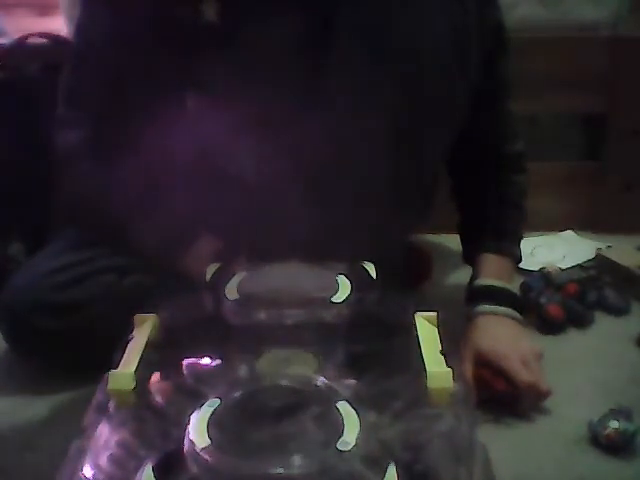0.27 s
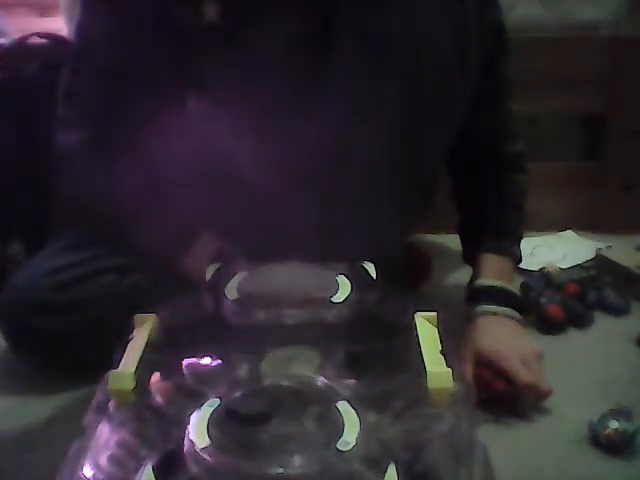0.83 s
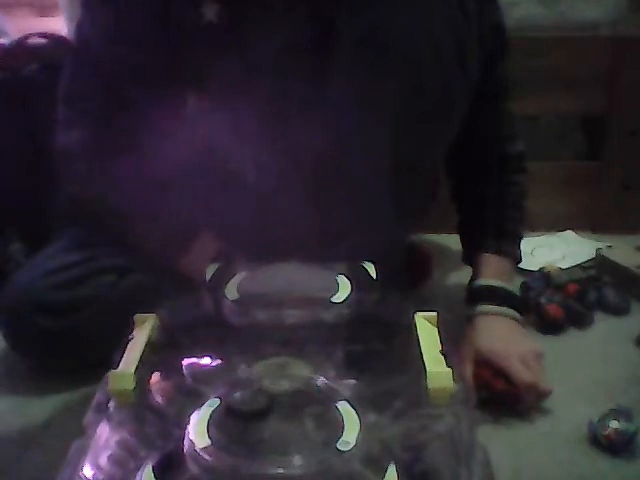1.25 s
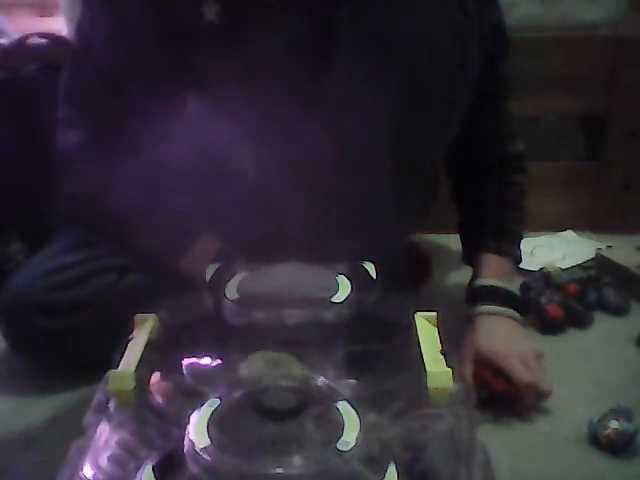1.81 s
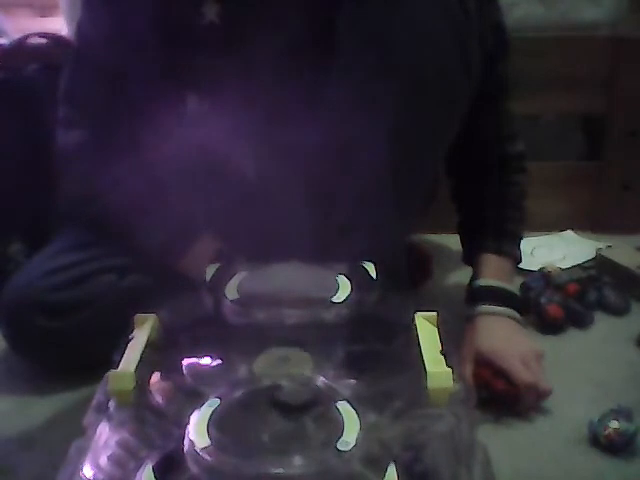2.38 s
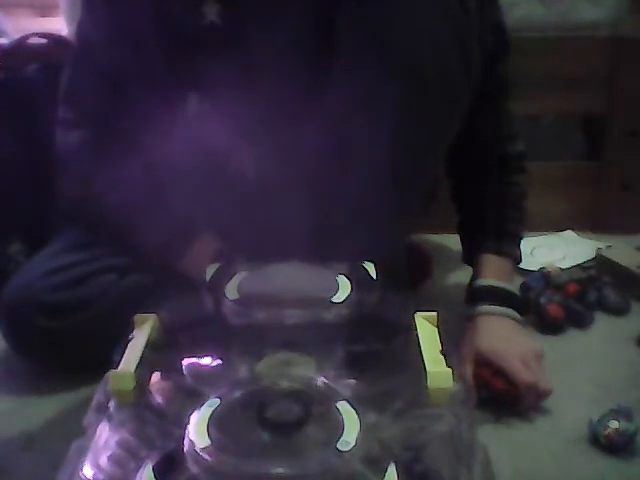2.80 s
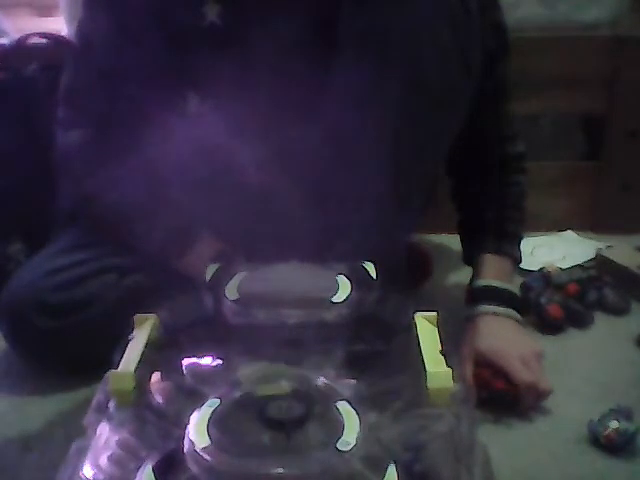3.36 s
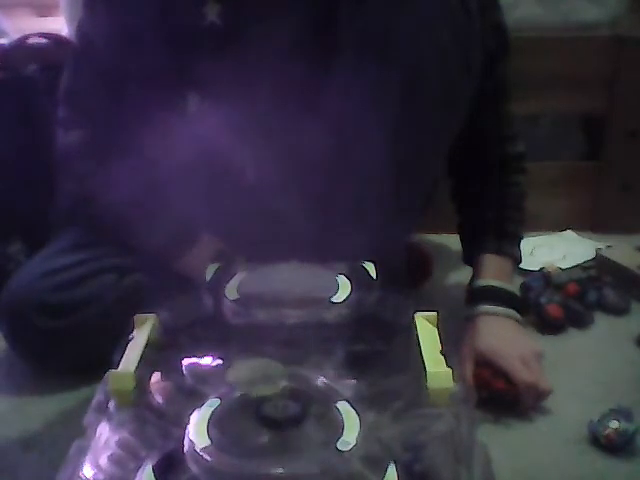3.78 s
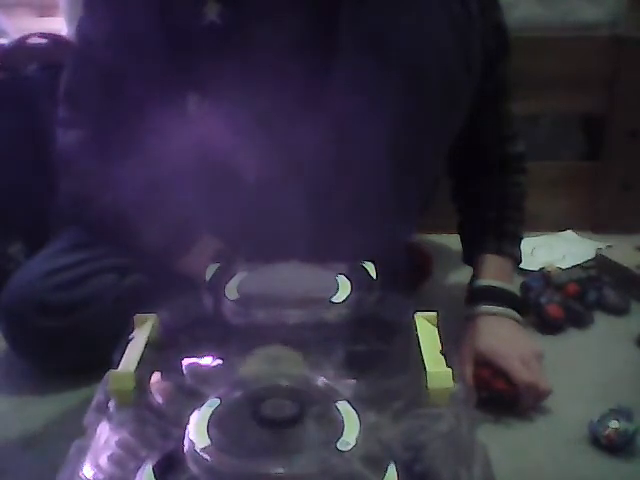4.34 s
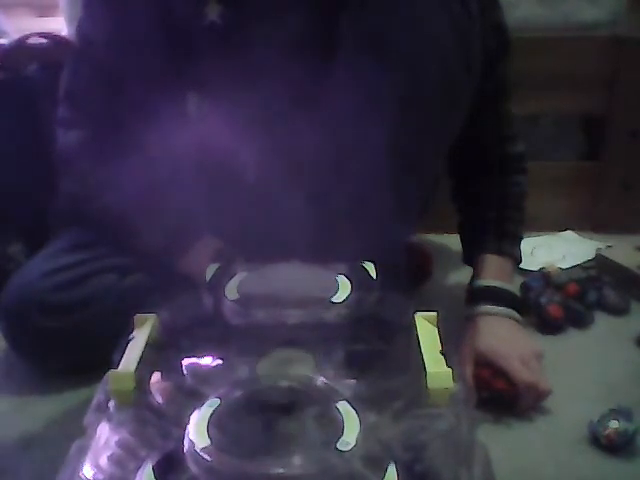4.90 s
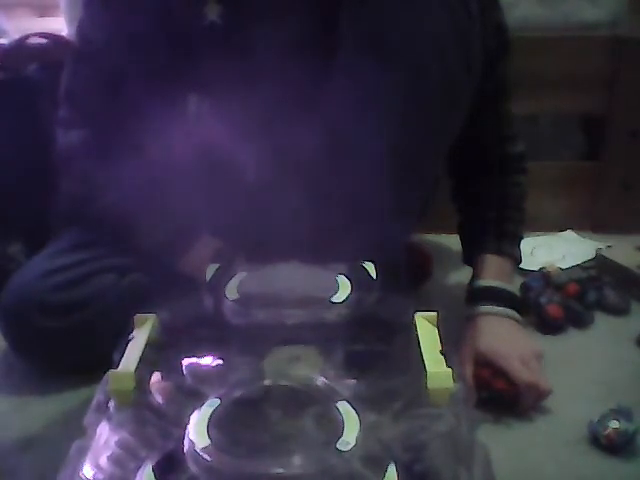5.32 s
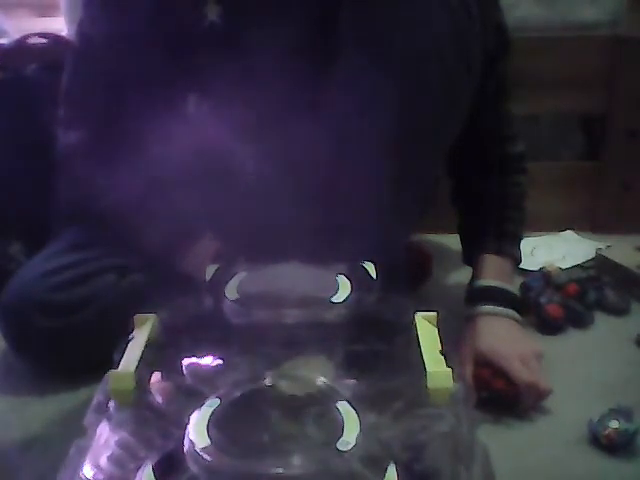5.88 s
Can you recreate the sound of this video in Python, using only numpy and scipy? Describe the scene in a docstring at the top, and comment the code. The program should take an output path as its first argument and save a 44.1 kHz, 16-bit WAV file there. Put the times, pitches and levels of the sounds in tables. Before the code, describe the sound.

Two plastic spinning tops murmur and chatter around a plastic bowl, cracking together sharply at irregular moments, with light ticks and brief wall rattles.

```python
"""First the murmur and chatter of two circling spinning tops, with a faint squeak of a sticking tip.
Then their rims clash: shaped noise bursts crack, and damped modes ring the shell and knock the walls.
Light taps repeat as the tops turn, and two harder blows make a metal weight ring sing on.
Twice a top is flung out: it knocks and rumbles along the wall, and the floor drones briefly.
A covered plastic stadium in a small, carpeted room adds dense echoes over rumble and hiss."""
import sys
import numpy as np
from scipy import signal
from scipy.fft import rfft, irfft
from scipy.io import wavfile
from scipy.ndimage import uniform_filter1d

SR = 44100
rng = np.random.default_rng(int(sys.argv[2]) if len(sys.argv) > 2 else 0)


def inscribe(sig):
    """Save sig as 16-bit PCM at rate SR to the path in sys.argv[1].

    A 1-D sig is mono; a 2-D sig holds one channel per row.
    Samples are clipped to [-1, 1] before scaling.
    """
    pcm = np.round(np.clip(np.atleast_2d(sig).T, -1, 1) * 32767)
    wavfile.write(sys.argv[1], SR, pcm.astype(np.int16))


N = 265923
TIME = np.arange(N) / SR
TAIL = TIME[:SR // 3]  # time axis of one short sound, s
TOP_HZ = 16000  # upper limit of the microphone


def undb(db):
    """Level law: decibels to amplitude gain."""
    return 10 ** (np.asarray(db) / 20)


def unit(x):
    """Energy normalisation: the sum of squares becomes 1."""
    return x / np.sqrt(np.sum(x ** 2))


def steady(x):
    """Power normalisation: the standard deviation becomes 1."""
    return x / np.std(x)


def along(hz, points):
    """Interpolation of (frequency, value) points on a logarithmic frequency axis."""
    point_hz, value = np.transpose(points)
    return np.interp(np.log(np.maximum(hz, 1)), np.log(point_hz), value)


def through(x, response):
    """Linear filtering: convolution with an impulse response."""
    return signal.fftconvolve(x, response)[:len(x)]


def colour(points, size=2048):
    """Minimum-phase filtering: a folded cepstrum gives a causal response to (Hz, dB) points."""
    log_spectrum = np.log(undb(along(np.fft.rfftfreq(size, 1 / SR), points)))
    cepstrum = irfft(log_spectrum)
    cepstrum[1:size // 2] *= 2
    cepstrum[size // 2 + 1:] = 0
    return unit(irfft(np.exp(rfft(cepstrum))))


def add(out, s, x):
    """Superposition: mix a sound in at a time in seconds."""
    i = max(int(s * SR), 0)
    out[i:i + len(x)] += x[:N - i]


def walk(rate):
    """Random modulation: smooth wandering with a spread near 1, built from `rate` draws a second."""
    k = int(SR / rate)
    draws = np.clip(rng.standard_normal(N // k + 1), -1.7, 1.7)
    return 1.2 * uniform_filter1d(np.repeat(draws, k), k)[:N]


def modes(table, scatter_db, push_s):
    """Modal superposition: the strike point sets each mode's strength and sign; a soft push starts gently."""
    hz, width, db = np.transpose(table)
    t = TAIL[:len(TAIL) // 2]
    strength_db = db + scatter_db * (2 * rng.random(len(hz)) - 1)
    sign = np.sign(rng.standard_normal(len(hz)))
    gain = np.sqrt(width) * undb(strength_db) * sign  # a wide mode dies sooner, so it starts stronger
    rings = np.exp(-np.pi * np.outer(width, t)) * np.sin(2 * np.pi * np.outer(hz, t))
    onset = 1 - np.exp(-(t / push_s) ** 2)
    return np.pad(unit(gain @ rings * onset), (0, len(TAIL) - len(t)))


def contact(rise_s, fall_s):
    """Contact noise: teeth grate past each other in a burst that rises and decays exponentially."""
    envelope = (1 - np.exp(-TAIL / rise_s)) ** 2 * np.exp(-TAIL / fall_s)
    return unit(rng.standard_normal(len(TAIL)) * envelope)


def skips(spin_hz, jitter, scatter_db, grit_db):
    """Impulsive excitation: a tip hops about once a turn (median rate spin_hz) and grinds over grit."""
    chance = rng.standard_normal((1200, 2))
    at = (np.cumsum(np.exp(jitter * chance[:, 0])) * SR / spin_hz).astype(int)
    hops = np.zeros(N)
    hops[at[at < N]] = undb(scatter_db * np.clip(chance[at < N, 1], -2, 2))
    grit = rng.standard_normal(N) * (rng.random(N) < 1500 / SR)  # about 1500 grains a second
    return steady(hops) + undb(grit_db) * steady(grit)


def grate(spin_hz, jitter, scatter_db, fall_s):
    """Amplitude-modulated noise: every hop of a tip scrapes up a short puff."""
    power = through(skips(spin_hz, jitter, scatter_db, grit_db=-6.5) ** 2, np.exp(-2 * TAIL / fall_s))
    return steady(np.sqrt(np.abs(power)) * rng.standard_normal(N))


# steady background spectrum: (frequency [Hz], relative level [dB])
BACKGROUND_SPECTRUM = [(20, 0.5), (45, -5.5), (70, -8), (150, -13.5), (230, -16), (440, -18), (560, -30),
                       (1100, -32), (1500, -39), (2600, -39.5), (5000, -44.5), (16000, -51)]
BACKGROUND_DB = -74


def background():
    """Stationary noise: shaped white noise makes faint room rumble and microphone hiss."""
    return undb(BACKGROUND_DB) * steady(through(rng.standard_normal(N), colour(BACKGROUND_SPECTRUM, size=8192)))


# reverberation of the enclosure: (frequency [Hz], 60 dB decay time [s])
DECAY_TIMES = [(150, 0.49), (500, 0.43), (1000, 0.22), (2500, .22), (5500, 0.2), (9000, 0.2), (15000, 0.19)]


def echoes(build_s):
    """Diffuse reverberation: lid and near walls return a dense tail, new at each call, soonest gone in the treble."""
    noise = rfft(rng.standard_normal(len(TAIL)))
    hz = np.fft.rfftfreq(len(TAIL), 1 / SR)
    centres, t60s = np.transpose(DECAY_TIMES)
    tail = 0
    for share, t60 in zip(np.eye(len(centres)), t60s):
        band = irfft(noise * along(hz, np.column_stack([centres, share])), len(TAIL))
        tail = tail + band * np.exp(-np.log(1000) * TAIL / t60)
    return unit(tail * (1 - np.exp(-(TAIL / build_s) ** 2)))


def room(x, wet_db):
    """Direct and reverberant fields: the sound plus its echoes."""
    return x + undb(wet_db) * through(x, echoes(build_s=.005))


def spot(ripple_db, count=110):
    """Standing waves: those under the lid favour other frequencies at every spot."""
    hz = np.linspace(1400, TOP_HZ, count)
    ripple = ripple_db * np.clip(rng.standard_normal(count), -1.6, 1.6)
    return colour(np.column_stack([hz, ripple * (hz > hz[0])]))  # flat up to the first point


# notes of a sticking tip: (start [s], length [s], centre frequency [Hz], level [dB])
SQUEAK_NOTES = [(0.0, .13, 2050, -67.5), (.27, 0.11, 4657, -72)]


def squeak():
    """Frequency modulation: a sticking tip sings a thin, wavering note that swells and fades."""
    out = 0
    for s, length_s, hz, db in SQUEAK_NOTES:
        swell = np.sin(np.pi * np.clip((TIME - s) / length_s, 0, 1))
        wavering_hz = hz + 70 * walk(rate=140)
        out = out + undb(db) * swell * np.sin(2 * np.pi * np.cumsum(wavering_hz) / SR)
    return out


# slow flexing modes of the bowl, before loading: (frequency [Hz], bandwidth [Hz], relative level [dB])
FLEX_MODES = [(240, 37, -5), (380, 26, -2), (540.4, 28, -2.5), (565, 7, -5), (802, 10, -3.5), (950, 11, -5),
              (1203, 15, -11.5)]
LEAN_DB, LEAN_SCATTER_DB = 26.5, 4  # one lean over the murmur's level, and the spread either way


def bumps(s, level_db, rate):
    """Mass loading: a wobbling top leans at random moments, which detunes and damps the bowl's modes."""
    out = np.zeros(N)
    swell = 1 - np.exp(-(TAIL / .007) ** 2)
    for k, (delay, weight, detune) in enumerate(rng.random((int(rate * N / SR), 3))):
        t = (k + delay) / rate
        # factors on frequency, bandwidth and level
        loaded = np.array(FLEX_MODES) * [np.exp(0.11 * (2 * detune - 1)), 2.2, 1]
        lean_db = np.interp(t, s, level_db) + LEAN_DB + LEAN_SCATTER_DB * (2 * weight - 1)
        add(out, t, undb(lean_db) * unit(swell * modes(loaded, scatter_db=13.0, push_s=0.0022)))
    return out


def roll(table, patchy_db, rate):
    """Nodal crossing: a moving tip crosses each mode's nodes, so the modes swell and fade on their own."""
    push = skips(spin_hz=69.4, jitter=.25, scatter_db=9.5, grit_db=1)
    out = 0
    for mode in table:
        patchy_push = push * undb(patchy_db * walk(rate))
        out = out + undb(mode[2]) * through(patchy_push, modes([mode], scatter_db=0, push_s=.002))
    return steady(out)


# bright modes of the bowl under the tips: (frequency [Hz], bandwidth [Hz], relative level [dB])
BOWL_MODES = [(1930, 21, -5), (2600, 17, -5), (3080, 60, -5.5), (3681, 69, 4), (4060, 74, -5),
              (3780, 260, -3.5), (4250, 84, -5), (4650, 130, -1), (5260, 90, -7.5), (5568, 140, -18)]
# spectrum of scraped plastic: (frequency [Hz], relative level [dB])
SCRATCH_SPECTRUM = [(300, -21), (1000, 1), (1450, 0.5), (2000, 3), (3000, 0), (4000, 3), (5200, 3),
                    (6500, -8), (9000, -27.5), (12000, -44.5), (16000, -59)]
# gentle travel over the bowl, swelling and ebbing as the tops circle:
# (time [s], murmur level before LEAN_DB [dB], chatter level before wobble [dB])
TRAVEL_LEVELS = [(0, -65.5, -72.5), (.23, -67, -75.5), (0.278, -69.5, -85), (.79, -64, -76.5),
                 (.88, -82.5, -102), (1.0, -70, -98), (1.22, -81.5, -84), (1.75, -67.5, -80),
                 (2.12, -72.5, -82), (2.48, -84.5, -92.5), (3.13, -68.5, -89), (3.801, -94, -104),
                 (4.08, -87.5, -80.5), (4.22, -81.5, -81), (4.582, -65, -80), (5.499, -99.5, -105),
                 (5.8, -76.5, -87)]


def travel():
    """Rolling excitation: circling tips make the bowl murmur and chatter, unevenly as the tops wobble."""
    s, murmur_db, chatter_db = np.transpose(TRAVEL_LEVELS)
    scratch = through(grate(spin_hz=110, jitter=0.85, scatter_db=0.0, fall_s=.006), colour(SCRATCH_SPECTRUM))
    wobble_db = 1.4 * walk(rate=17)
    chatter = roll(BOWL_MODES, patchy_db=5.5, rate=14) + undb(-7) * scratch
    chatter_gain = undb(np.interp(TIME, s, chatter_db) + wobble_db)
    return bumps(s, murmur_db, rate=19) + chatter * chatter_gain


# floor drones, pitched by the spot: (time [s], frequency [Hz], level [dB])
FLOOR_BOOMS = [(0.566, 230.4, -49), (0.605, 185.5, -55.5), (5.034, 245, -50), (5.052, 120, -55),
               (5.141, 123.8, -54)]


def booms(swell_s, t60):
    """Plate flexure: the thin floor, loaded by a flung top, swells into a low, short drone."""
    out = np.zeros(N)
    swell = 1 - np.exp(-(TAIL / swell_s) ** 2)
    for s, hz, db in FLOOR_BOOMS:
        decay = undb(db - 60 * TAIL / t60)
        add(out, s, decay * swell * np.sin(2 * np.pi * hz * TAIL))
    return out


# spectrum of the drummed wall: (frequency [Hz], relative level [dB])
RUMBLE_SPECTRUM = [(70, -35.5), (105, -14), (130, -7.5), (175, -11.5), (240, -1.5), (370, 2.5), (540, 3.5),
                   (680, -2), (860, 8.5), (1150, -6), (1450, -18), (3500, -17), (8000, -53.5),
                   (16000, -77.5)]
# two rides along the wall, each a list of: (time [s], rumble level [dB], scratch level [dB])
WALL_RIDES = [
    [(.525, -74.5, -94), (.548, -49, -62), (.61, -47, -52), (.64, -62, -84), (.73, -85, -74)],
    [(4.69, -53.5, -70.5), (4.822, -54, -62.5), (4.832, -43, -50.5), (4.875, -47, -53.5),
     (4.92, -53.5, -67.5), (5.02, -62.5, -58), (5.18, -59, -57.5), (5.22, -66.5, -78), (5.35, -67.5, -77)],
]


def rides():
    """Forced vibration: a top running along the wall drums the thin plastic and scratches its surface."""
    out = 0
    for ride in WALL_RIDES:
        s, rumble_db, scratch_db = np.transpose(ride)
        riding = (TIME > s[0]) & (TIME < s[-1])
        drumming = grate(spin_hz=140.3, jitter=.4, scatter_db=-1.0, fall_s=0.013)
        drumming = drumming * undb(np.interp(TIME, s, rumble_db)) * riding
        scratching = grate(spin_hz=116.0, jitter=0.83, scatter_db=7.5, fall_s=0.0087)
        scratching = scratching * undb(np.interp(TIME, s, scratch_db)) * riding
        out = out + through(drumming, colour(RUMBLE_SPECTRUM)) + through(scratching, colour(SCRATCH_SPECTRUM))
    return out


# knocks of a top against the wall: (time [s], level [dB])
WALL_KNOCKS = [(0.379, -22.5), (0.5595, -20), (0.5982, -21.5), (4.7581, -24), (4.784, -25), (4.828, -21),
               (4.9612, -32), (5.045, -22.5), (5.229, -30.5)]


def knocks():
    """Impact excitation: a flung top bumps the wall with a dull, gritty clack and rings the bowl's modes."""
    out = np.zeros(N)
    for s, db in WALL_KNOCKS:
        burst = contact(rise_s=.0005, fall_s=0.0029) + undb(3.0) * echoes(build_s=0.0039)
        clack = unit(through(burst, colour(SCRATCH_SPECTRUM)))
        ring = modes(BOWL_MODES, scatter_db=8.0, push_s=.001)
        add(out, s, undb(db) * (clack + undb(-3) * ring))
    return out


# spectrum of a light tick: (frequency [Hz], relative level [dB])
TICK_SPECTRUM = [(300, -22.5), (1000, -16), (1500, -22.5), (2900, -15.5), (3800, 7.5), (4500, 3.5),
                 (5400, -22.5), (6500, -30), (9000, -38.5), (16000, -58.5)]
# light taps of the tops on each other and on the bowl: (time [s], level of the first touch [dB])
LIGHT_TAPS = [(0.088, -47), (0.217, -44.5), (0.6762, -34.5), (0.716, -44.5), (0.7808, -40), (0.963, -43.5),
              (1.016, -47.5), (1.1362, -48.5), (1.726, -42), (2.0223, -36), (2.0781, -38.5), (2.9831, -49),
              (3.3114, -39.5), (4.232, -43.5), (4.292, -38.5), (4.4611, -36.5), (4.526, -43), (4.5658, -42),
              (5.5668, -43.5)]
# time of one turn [s]; level step per turn and its spread either way [dB]
TURN_S, REBOUND_DB, REBOUND_SCATTER_DB = 0.0082, -7.5, 3


def taps(count=3):
    """Repeated impact: glancing ticks ring the bowl and come again, usually weaker, on the next turns."""
    out = np.zeros(N)
    for s, db in LIGHT_TAPS:
        for turn in range(count):
            bright_ring = modes(BOWL_MODES, scatter_db=16, push_s=.002)
            flex_ring = modes(FLEX_MODES, scatter_db=12.0, push_s=0.0083)
            burst = contact(rise_s=.0008, fall_s=0.0036) + echoes(build_s=0.0052)
            tick = unit(through(burst, colour(TICK_SPECTRUM)))
            heard_tick = unit(through(tick, spot(ripple_db=4.0)))
            touch = bright_ring + undb(-3.5) * flex_ring + undb(-2) * heard_tick
            touch_db = db + turn * (REBOUND_DB + REBOUND_SCATTER_DB * rng.uniform(-1, 1))
            add(out, s - .001 + turn * TURN_S, undb(touch_db) * touch)
    return out


# modes of the metal weight ring: (frequency [Hz], relative level [dB], 60 dB decay time [s])
RING_MODES = [(7892, -11, .33), (7920, 4, 0.33), (7090, -6.5, 0.27)]
# blows that catch the weight ring: (time [s], level [dB])
RING_BLOWS = [(3.415, -60), (5.091, -49.5)]


def pings():
    """Beating modes: a weight ring sings on after a square blow, its close pair of modes beating."""
    out = np.zeros(N)
    ring = sum(undb(db - 60 * TAIL / t60) * np.sin(2 * np.pi * hz * TAIL) for hz, db, t60 in RING_MODES)
    for s, db in RING_BLOWS:
        add(out, s, undb(db) * ring)
    return out


# spectrum of a hard crack: (frequency [Hz], relative level [dB])
CRACK_SPECTRUM = [(90, -26.5), (160, -17), (260, -12.5), (450, -9), (700, -12.5), (1050, -7), (1420, -13.5),
                  (2200, -8), (3200, -5), (5100, 2), (6500, -2.5), (9000, -11), (12000, -17), (16000, -32)]
# modes of the shell and tops under a clash: (frequency [Hz], bandwidth [Hz], relative level [dB])
SHELL_MODES = [(1490.4, 11, -14), (1758, 12, -8.5), (2115, 49, -6), (2670, 13, -13), (2984, 12, -7),
               (3012, 26, -7), (3260, 30, -12), (3417, 40, -11), (3852, 45, 1), (4310, 45, 0.5),
               (4700, 30, -3), (5060, 60, -3), (4980, 10, -3), (4980, 80, -1), (5010, 65, -4.5),
               (5280, 18, -1.5), (6000, 65, -7.5), (6550, 46, -11.5), (7250, 18, -4.5), (7000, 50, -9),
               (9000, 35, -14), (10700, 59, -6.5), (11950, 26, -12)]
# low modes of the stadium's walls: (frequency [Hz], bandwidth [Hz], relative level [dB])
WALL_MODES = [(203, 33, -17), (350, 200, -15.5), (435, 25, -19), (567, 30, -16.5), (829, 23, -9),
              (900, 24, -5.5), (983, 62, 1.5), (1131, 45, -2.5), (1212, 28, -9)]
# clashes of the rims: (time [s], crack level [dB], wall knock level [dB])
RIM_CLASHES = [(0.389, -1, -8), (1.3, -10, -15), (1.543, -16, -25.5), (1.8087, -15.5, -57.5),
               (1.841, -16.5, -25.5), (2.201, -8.5, -20), (2.58, -19, -22.5), (2.732, -13, -16),
               (3.412, -6, -20), (4.032, -17, -30), (4.047, -6.5, -20), (4.679, -2.5, -12),
               (5.089, -4.5, -18), (5.285, -13, -22), (5.647, -22.5, -30.5), (5.679, -19, -30.5),
               (5.883, -11.5, -22.5)]
# crack level at which nothing is dulled [dB]; dB lost at 11 kHz, against 5.5 kHz, per dB softer
HARD_DB, DULLING = -4, 0.52


def clashes():
    """Impact hardness: each clash cracks, rings shell and walls; a harder one has more snap and treble."""
    out = np.zeros(N)
    for s, crack_db, knock_db in RIM_CLASHES:
        hardness_db = DULLING * (crack_db - HARD_DB)
        edge = colour([(5500, 0), (11000, 1.0 * hardness_db), (16000, 5.1 * hardness_db)])
        snap = np.roll(contact(rise_s=.0005, fall_s=0.002), SR // 1000)  # 1 ms later
        strike = undb(2.5 + 0.6 * hardness_db) * snap
        burst = strike + contact(rise_s=0.001, fall_s=0.0077) + undb(1.5) * echoes(build_s=0.0054)
        edged_burst = through(through(burst, colour(CRACK_SPECTRUM)), edge)
        crack = unit(through(edged_burst, spot(ripple_db=3.0)))
        shell = unit(through(modes(SHELL_MODES, scatter_db=9.5, push_s=.0015), edge))
        knock = room(modes(WALL_MODES, scatter_db=8, push_s=0.0058), wet_db=-8.5)
        add(out, s - .0004, undb(crack_db) * (crack + undb(-6.0) * shell))
        add(out, s + .001, undb(knock_db) * knock)
    return out


def scene():
    """Superposition of sources: all sounds of the stadium, with extra echoes on the rubbing ones."""
    rubbing = room(travel() + rides() + squeak(), wet_db=-3.0)
    impacts = clashes() + pings() + taps() + knocks()
    return (impacts + rubbing + booms(swell_s=0.011, t60=0.49) + background())[None]


def record(dry):
    """Band limiting: the microphone cuts the top and rests slightly off zero."""
    low_pass = signal.ellip(8, .2, 70, TOP_HZ, fs=SR, output="sos")  # .2 dB ripple, 70 dB stopband
    return signal.sosfilt(low_pass, dry) + .0006


dry = scene()
out = record(dry)
inscribe(out)
```